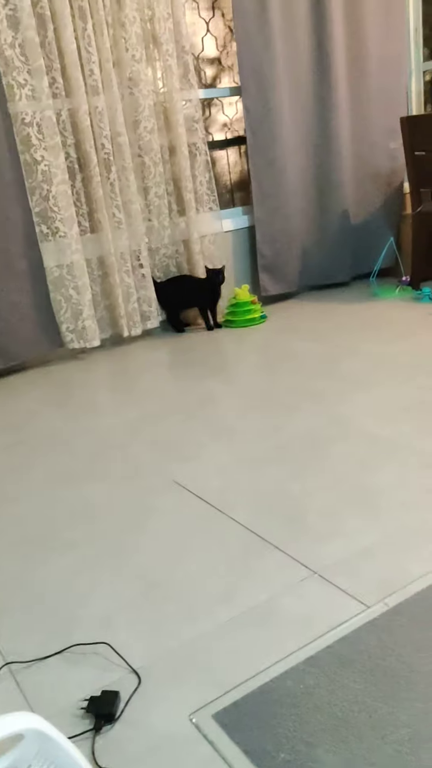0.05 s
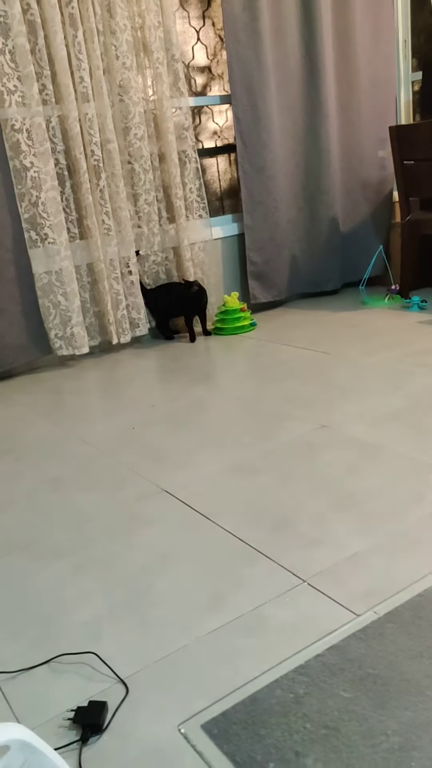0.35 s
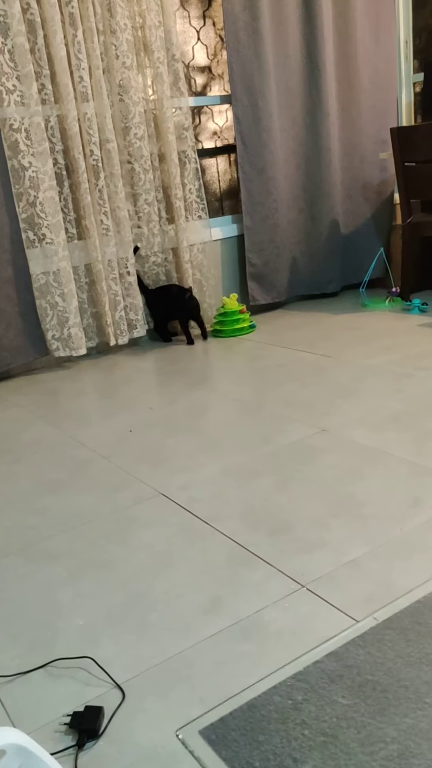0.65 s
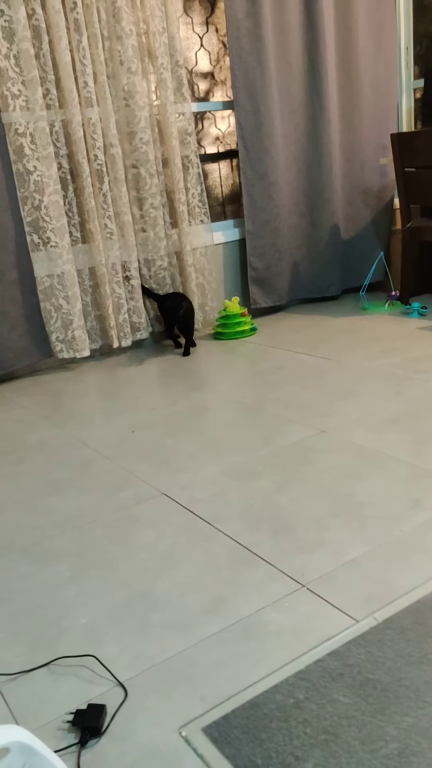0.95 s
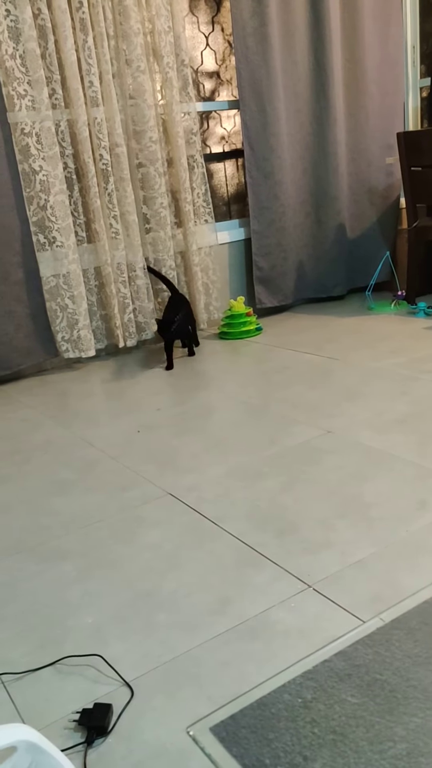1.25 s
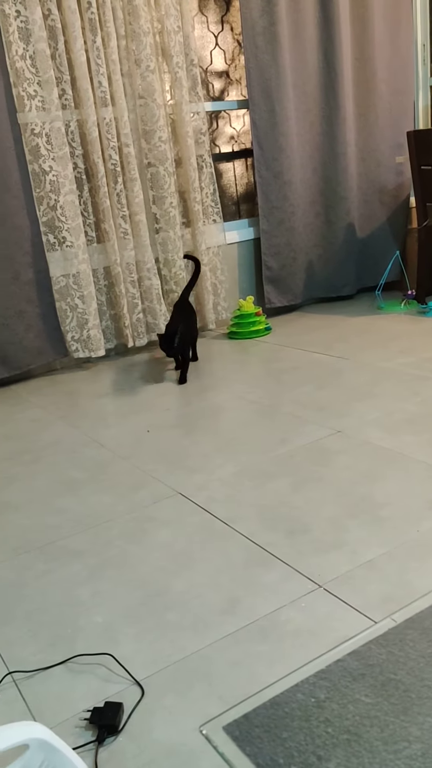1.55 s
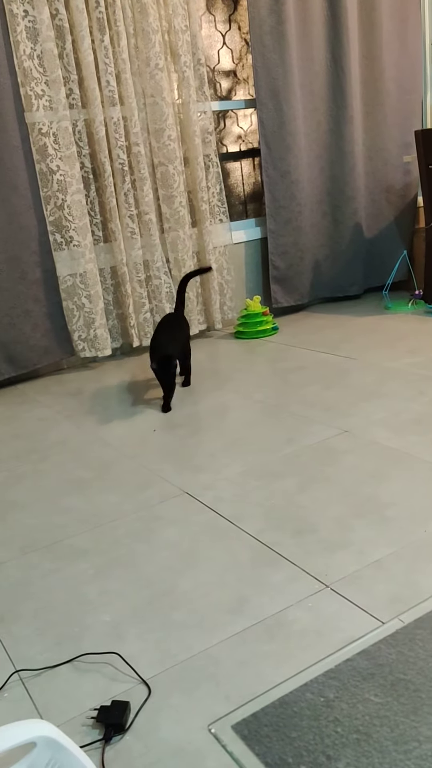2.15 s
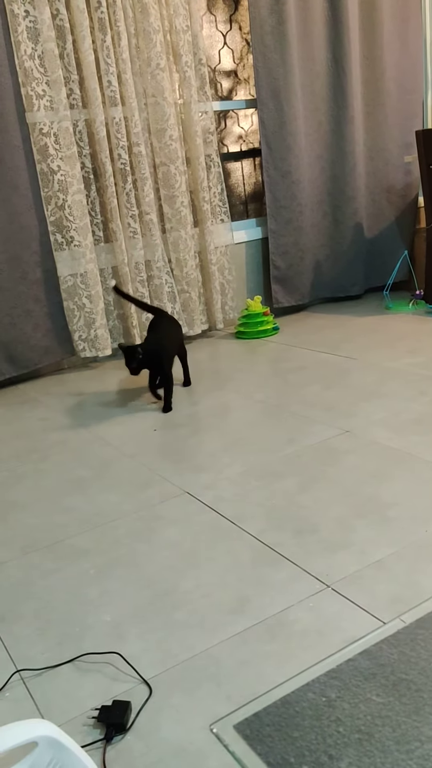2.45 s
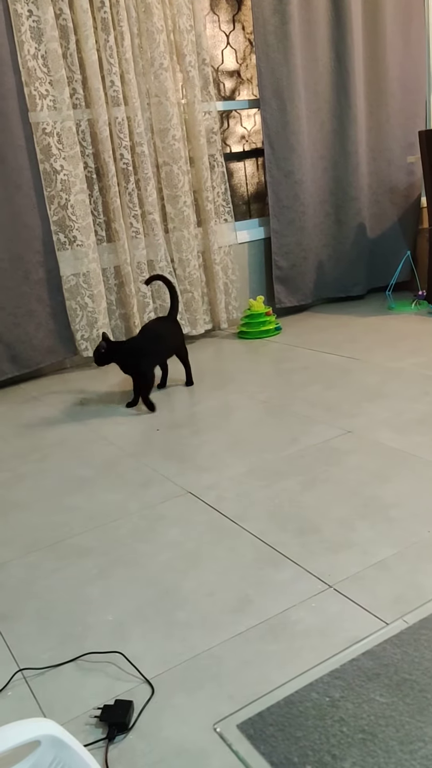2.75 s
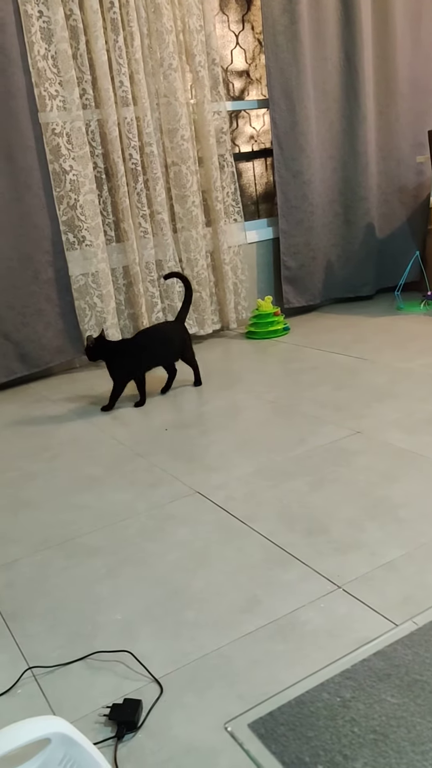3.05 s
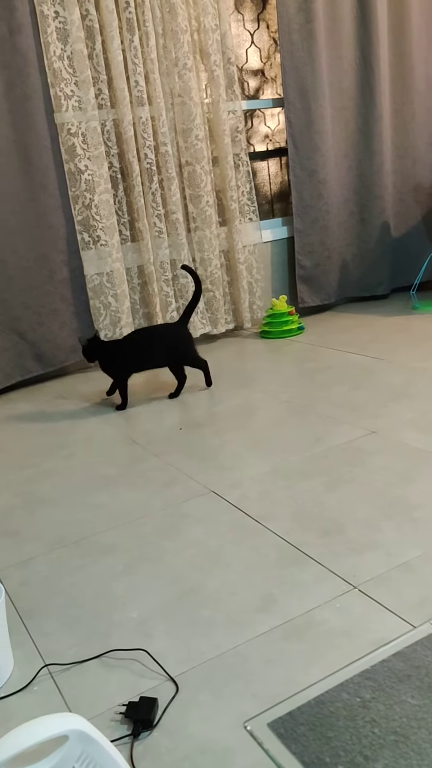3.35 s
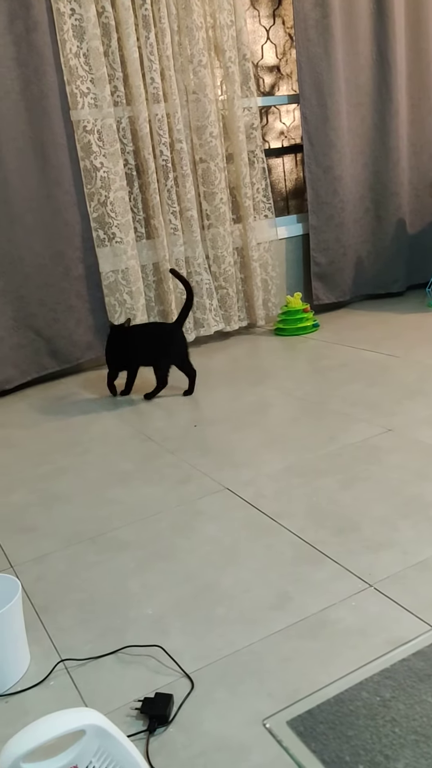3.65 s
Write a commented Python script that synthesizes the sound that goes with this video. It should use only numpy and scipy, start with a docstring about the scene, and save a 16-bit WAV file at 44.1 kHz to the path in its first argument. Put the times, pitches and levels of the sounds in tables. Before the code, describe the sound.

A cat gives one soft, rising trill after a couple of seconds of low room rumble, faint hum and hiss. The tiled room adds a short echo, and three tiny ticks come near the start.

```python
"""A cat's trill in a tiled room

A cat gives one soft, rising trill with its mouth closed. A flutter in its throat makes the voice
pulse, its throat and nose shape the tone, and the tiled room adds a short echo.
Behind it, a deep swelling drone, a faint machine hum, room rumble and hiss fade in.
Three tiny ticks come near the start."""
import sys
import numpy as np
from scipy import signal
from scipy.fft import rfft, irfft
from scipy.io import wavfile

SR = 44100
rng = np.random.default_rng(int(sys.argv[2]) if len(sys.argv) > 2 else 0)


def persist_wave(psi):
    """Save psi, clipped to +-1, as 16-bit WAV."""
    counts = np.round(np.clip(psi, -1, 1) * 32767).astype(np.int16)
    wavfile.write(sys.argv[1], SR, np.atleast_2d(counts).T)


N = 171990


def from_db(db):
    """Turn decibels into a number to multiply a sound by."""
    return 10 ** (np.asarray(db) / 20)


def rms_one(x):
    """Scale a signal so that its average strength (rms) is 1."""
    return x / np.sqrt(np.mean(x ** 2) + 1e-20)


def in_time(rows):
    """Join a table's points in time with straight lines: one curve per value column."""
    times, *columns = np.transpose(rows)
    return [np.interp(np.arange(N) / SR, times, column) for column in columns]


def at_hz(points, hz):
    """Read a table at any frequency, giving each octave equal space."""
    table_hz, values = np.transpose(points)
    return np.interp(np.log(np.maximum(hz, 1)), np.log(table_hz), values)


def running_phase(hz):
    """How far a wave of changing pitch has turned, in radians."""
    return 2 * np.pi * np.cumsum(hz) / SR


def panned(pan_db):
    """Left and right gains; a positive pan_db leans left."""
    return from_db(np.array([[.5], [-.5]]) * pan_db)


def drift(rate_hz):
    """A random wander of typical size 1, mostly slower than rate_hz."""
    hz = np.arange(N // 2 + 1) * SR / N
    return rms_one(irfft(rfft(rng.standard_normal(N)) / (1 + (hz / rate_hz) ** 2), N))


def shaped_noise(spectrum, lean=None):
    """Stereo noise with a given tone colour: centred in the bass, spread wide in the treble."""
    # how alike left and right are: frequency_hz, correlation
    likeness = [(50, 0.73), (150, 1), (350, 0.73), (700, 0.32), (1400, 0), (3000, 0), (15000, 0.021)]
    hz = np.arange(N // 2 + 1) * SR / N
    mid, side = rfft(rng.standard_normal((2, N))) * from_db(at_hz(spectrum, hz)) * (hz > 20)
    alike = np.clip(at_hz(likeness, hz), -1, 1)
    stereo = np.sqrt(1 + alike) * mid + np.sqrt(1 - alike) * side * [[1], [-1]]
    balance = panned(at_hz(lean, hz)) if lean else 1
    return rms_one(irfft(balance * stereo, N))


def rumble_and_hiss():
    """The room's low rumble and thin hiss, rising and falling together."""
    # tone colour of the rumble: frequency_hz, relative_db
    rumble_colour = [(50, -14), (75, -21), (100, -22.5), (125, -25), (180, -20), (260, -24.5), (390, -30),
                     (470, -34), (580, -32.5), (700, -36.5), (850, -38), (1200, -39.5), (2500, -49),
                     (4000, -55.5), (6000, -62.5), (9000, -68)]
    # tone colour of the hiss: frequency_hz, relative_db
    hiss_colour = [(2000, -33), (5000, -14.5), (7000, 1.5), (9000, -0.5), (12000, 3.5), (15000, 7.5),
                   (17000, -9.5)]
    # which side the noise leans to: frequency_hz, left_minus_right_db
    lean = [(120, 0), (350, -0.4), (800, 2.6), (1500, -0.5), (3000, 2.3), (5500, -6.5), (7500, -2),
            (9500, 6.5), (12000, 2), (15000, 1.5)]
    # the rumble's rise and fall, which the hiss follows more gently: time_s, change_db
    swell = [(0.3, -1), (0.5, 0), (1.25, 3), (1.6, 0), (2.02, -2), (2.3, 3), (2.45, 2), (3.15, 3.5),
             (3.66, 5), (3.8, 2), (3.9, 1.5)]
    swell_db, = in_time(swell)
    low_cut = signal.butter(2, 60, "high", fs=SR, output="sos")
    rumble = rms_one(signal.sosfilt(low_cut, shaped_noise(rumble_colour, lean)))
    hiss = shaped_noise(hiss_colour, lean)
    return from_db(-46.5 + swell_db) * rumble + from_db(-67 + 0.63 * swell_db) * hiss


def machine_hum():
    """A machine's few low tones, each wavering a little."""
    # the tones of the hum: pitch_hz, relative_db
    tones = [(96, -53.5), (117, -60.5), (151, -57.5), (189, -57), (215, -57), (396, -69), (593, -65)]
    t, hum = np.arange(N) / SR, np.zeros(N)
    for hz, db in tones:
        waver = 1 + 0.44 * drift(rate_hz=5.1)
        phase = 2 * np.pi * hz * t + 0.31 * drift(rate_hz=1.1)
        hum += np.sqrt(2) * from_db(db) * waver * np.sin(phase)
    return hum


def drone():
    """One deep tone that swells and sinks."""
    # the drone's path: time_s, pitch_hz, relative_db
    path = [(0.17, 42, -72), (0.28, 42, -43.5), (1.1, 42, -41.5), (1.55, 41, -41.5), (1.63, 41, -54),
            (1.69, 41, -43), (1.87, 41, -50), (2.08, 41, -39), (2.18, 40, -30), (2.27, 39.5, -27.5),
            (2.36, 40, -32), (2.43, 44, -41), (2.52, 41, -34), (2.64, 41, -44), (2.93, 41, -35),
            (3.25, 39.5, -30.3), (3.35, 38.4, -31.3), (3.45, 38.3, -36.5), (3.63, 38.3, -30.5),
            (3.73, 39.6, -49), (3.80, 40, -43)]
    hz, db = in_time(path)
    return np.sqrt(2) * from_db(db) * np.sin(running_phase(hz))


def mic_settling():
    """The microphone's offset settling: a slow swing that soon dies away, too low to hear."""
    start_s, swing_hz, decay_s = 0.18, 1.34, 0.23
    age = np.maximum(np.arange(N) / SR - start_s, 0)
    return from_db(-20) * np.sin(2 * np.pi * swing_hz * age) * np.exp(-age / decay_s)


def ticks():
    """Tiny dry clicks, each a dulled spike with a trace of grit behind it."""
    # the clicks before they are dulled: start_s, level_db, left_minus_right_db
    events = [(0.1915, -32, 3), (0.2500, -25.5, .5), (0.7094, -34, .5)]
    grit_decay_s, dull_above_hz = .0007, 1610
    t, clicks = np.arange(N) / SR, np.zeros((2, N))
    for start_s, level_db, pan_db in events:
        decay = (t >= start_s) * np.exp(-np.abs(t - start_s) / grit_decay_s)
        click = from_db(-18.5) * decay * rng.standard_normal((2, N))
        click[:, int(start_s * SR)] += 1
        clicks += from_db(level_db) * panned(pan_db) * click
    smoothing = np.exp(-2 * np.pi * dull_above_hz / SR)
    return signal.lfilter([1 - smoothing], [1, -smoothing], clicks + 1e-18)


def room_echo(sound):
    """Many reflections off the tiles blur into a tail about half a second long."""
    low_fade_s, high_fade_s, split_hz = 0.52, 0.53, 2500   # a fade is the time to fall by 60 dB
    t = np.arange(SR) / SR
    noise = shaped_noise([(100, 0), (10000, 0)])[:, :SR]
    low = signal.sosfilt(signal.butter(2, split_hz, fs=SR, output="sos"), noise)
    high = signal.sosfilt(signal.butter(2, split_hz, "high", fs=SR, output="sos"), noise[::-1, ::-1])
    tail = low * from_db(-60 * t / low_fade_s) + high * from_db(-60 * t / high_fade_s)
    tail *= t > .004   # a gap before the first reflection
    return signal.fftconvolve(sound[None], rms_one(tail) / np.sqrt(SR), axes=1)[:, :N]


def cat_trill():
    """A rising, slightly raspy voice, chopped by a throat flutter that eases towards the end."""
    # the tune of the trill: time_s, pitch_hz
    tune = [(2.46, 595), (2.52, 553), (2.60, 562), (2.68, 580), (2.75, 615), (2.80, 665), (2.835, 706),
            (2.94, 722), (2.99, 704)]
    # how strongly the cat voices it: time_s, relative_db
    effort = [(2.44, -71), (2.48, -57), (2.53, -48), (2.57, -50), (2.64, -47), (2.72, -51), (2.80, -48.5),
              (2.85, -44.5), (2.965, -46.5), (3.005, -68)]
    # how much the throat flutters: time_s, depth_0_to_1
    flutter_depth = [(2.46, .9), (2.53, .6), (2.64, .6), (2.73, .95), (2.82, .8), (2.90, .5), (2.97, .3)]
    # how the throat and nose boost or soften the overtones: frequency_hz, gain_db
    throat = [(550, 1.5), (720, -1), (1120, -7), (1430, -3), (1680, -14), (2150, -32.5), (2900, -45),
              (3900, -51), (4350, -32), (5000, -53), (6500, -47), (7500, -45), (9500, -55)]
    # tone colour of the thin nasal edge: frequency_hz, relative_db
    edge_colour = [(3900, -18), (4280, 0), (4500, -1), (5100, -20), (6200, -7.5), (6800, -7.5),
                   (7500, -4.5), (8600, -17), (12000, -34)]
    # strength of that edge: time_s, relative_db
    edge_level = [(2.50, -92), (2.60, -76), (2.78, -80), (2.84, -77), (2.93, -75.5), (2.98, -72),
                  (3.03, -79)]
    # tone colour of the breathy rasp: frequency_hz, relative_db
    rasp_colour = [(200, -19), (600, 3), (1300, 0.5), (1950, 0), (2600, -16.5), (3500, -11), (5500, -24),
                   (8000, -35), (14000, -45)]
    # strength of that rasp: time_s, relative_db
    rasp_level = [(2.43, -81.5), (2.48, -62), (2.55, -68), (2.69, -70.5), (2.715, -56), (2.76, -63),
                  (2.81, -76), (2.97, -76), (3.03, -85)]
    flutter_hz, pitch_wobble, pitch_jitter, shimmer_db = 42, .042, .032, 2.2
    pitch, = in_time(tune)
    depth, = in_time(flutter_depth)
    flutter = np.sin(running_phase(flutter_hz * (1 + 0.116 * drift(rate_hz=15.6))))
    pitch *= 1 + pitch_wobble * depth * flutter + pitch_jitter * depth * drift(rate_hz=80)
    phase = running_phase(pitch)
    voice = sum(from_db(at_hz(throat, k * pitch)) * np.sin(k * phase) for k in range(1, 15))
    voice *= np.sqrt(2) * from_db(in_time(effort)[0] + shimmer_db * drift(rate_hz=30))
    edge = from_db(in_time(edge_level)[0]) * shaped_noise(edge_colour)[0]
    rasp = from_db(in_time(rasp_level)[0]) * shaped_noise(rasp_colour)[0]
    rasp *= 1 + 0.42 * np.cos(phase)   # the breath pulses with each vibration of the voice
    t = np.arange(N) / SR
    sounding = (t > rasp_level[0][0]) & (t < rasp_level[-1][0])
    return (voice + edge + rasp) * (1 + 0.67 * depth * flutter) * sounding


def scene():
    """The cat and its echo over a background that fades in."""
    # the background's fade-in, held at its last value: time_s, gain_db
    fade_in = [(0, -75), (0.028, -59), (0.036, -23), (0.1, -15.5), (0.16, -10.5), (0.21, -6), (0.3, -4)]
    trill = cat_trill()
    cat = panned(pan_db=.8) * (from_db(-5.5) * trill + from_db(-1.7) * room_echo(trill))
    fade = from_db(in_time(fade_in)[0])
    return cat + ticks() + mic_settling() + fade * (rumble_and_hiss() + machine_hum() + drone())


def record(dry):
    """Cut off the very highest treble steeply."""
    cutoff_hz = 15650
    return signal.sosfilt(signal.ellip(12, .1, 90, cutoff_hz, fs=SR, output="sos"), dry)


dry = scene()
out = record(dry)
persist_wave(out)
```